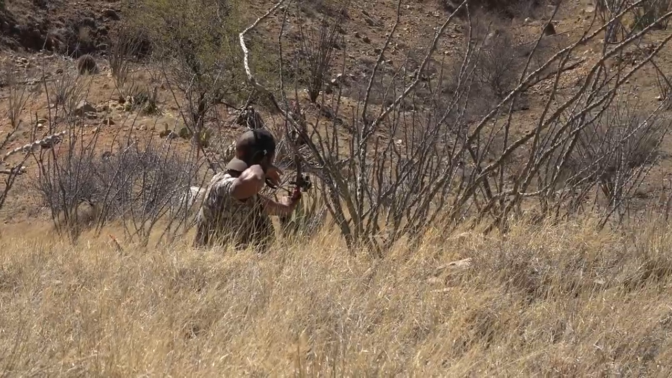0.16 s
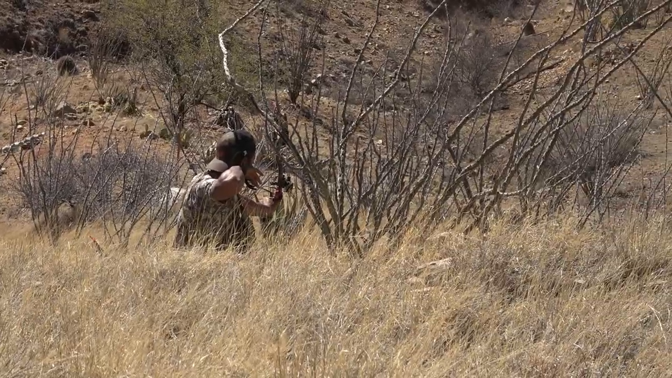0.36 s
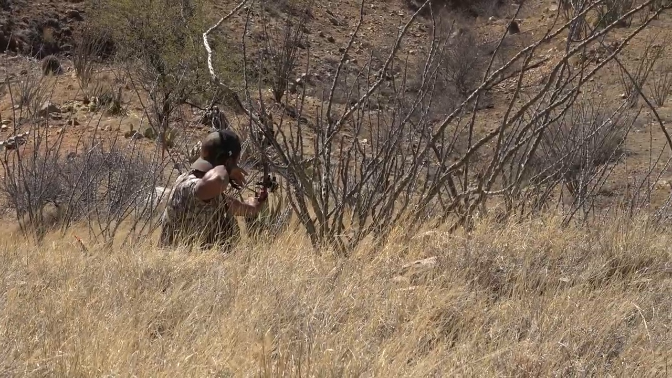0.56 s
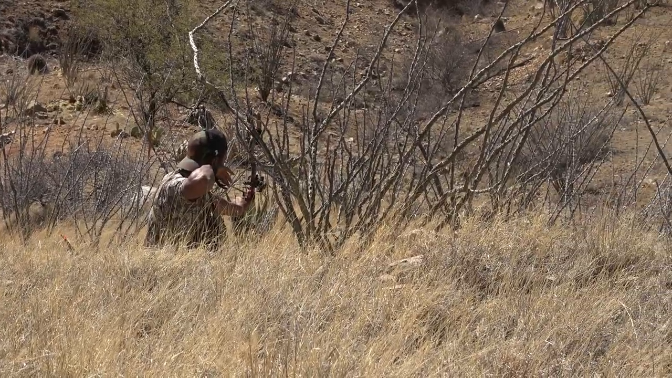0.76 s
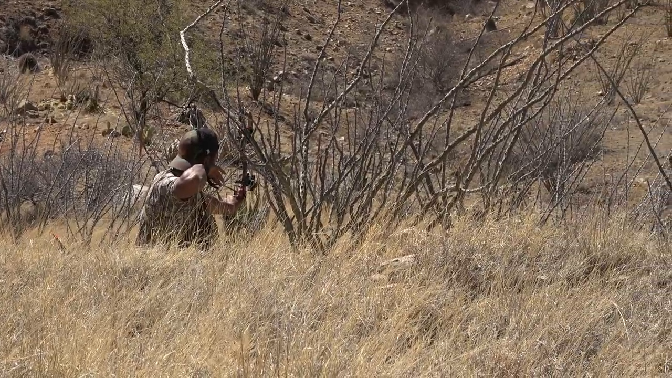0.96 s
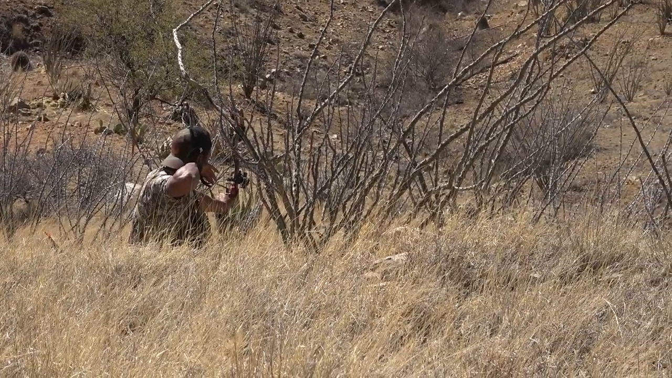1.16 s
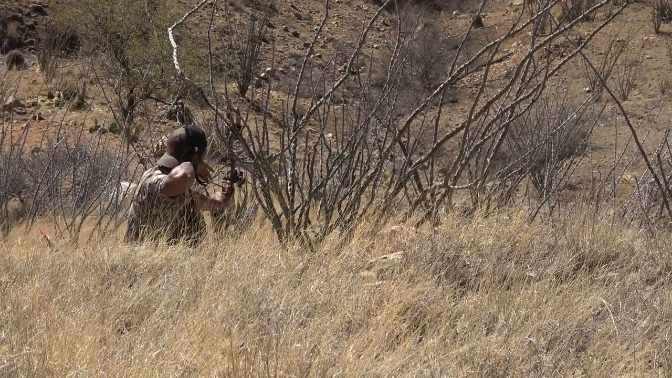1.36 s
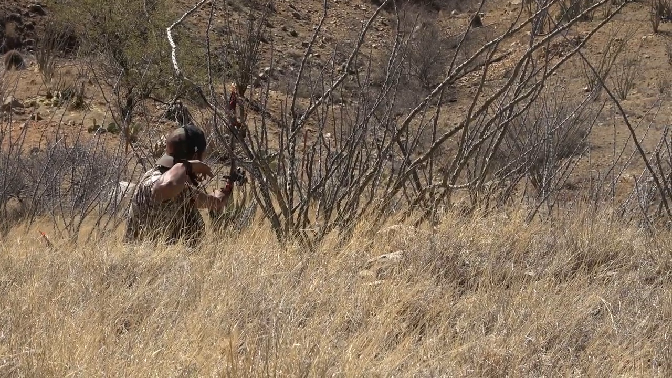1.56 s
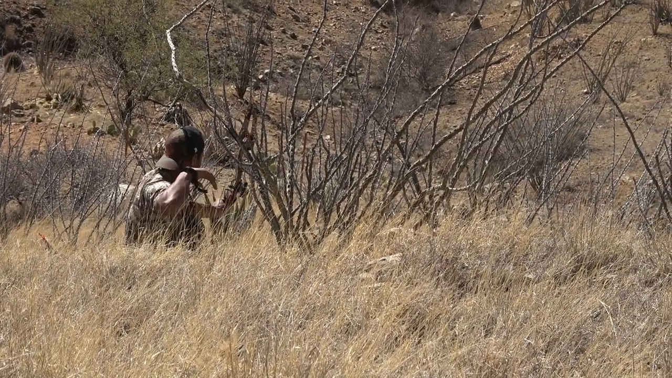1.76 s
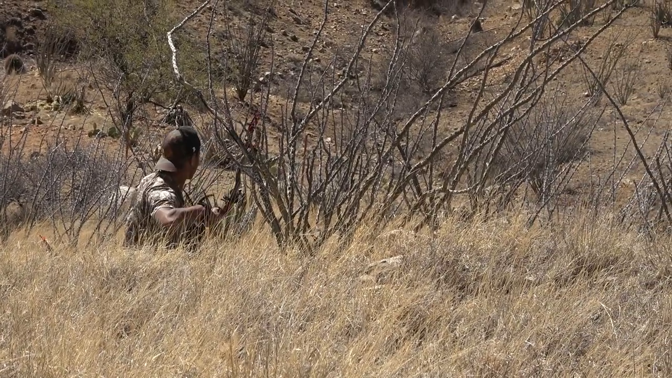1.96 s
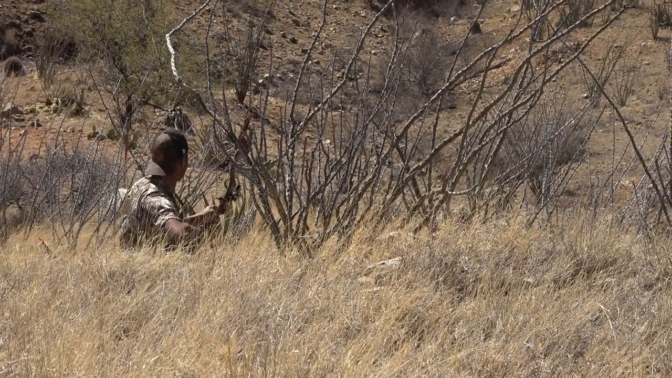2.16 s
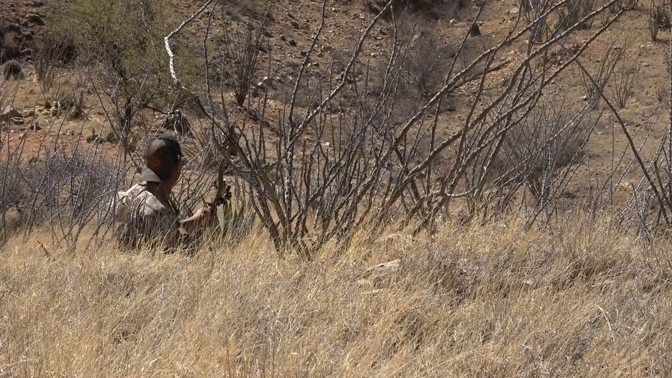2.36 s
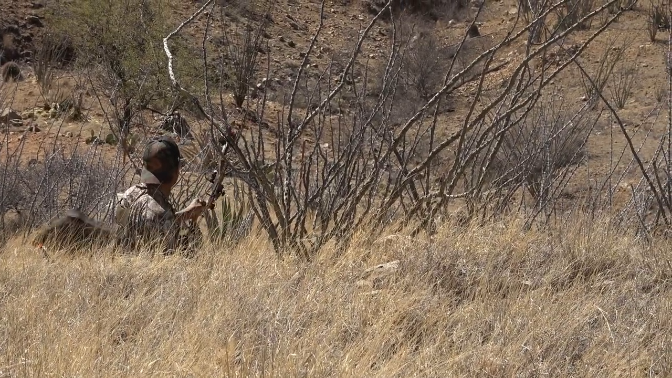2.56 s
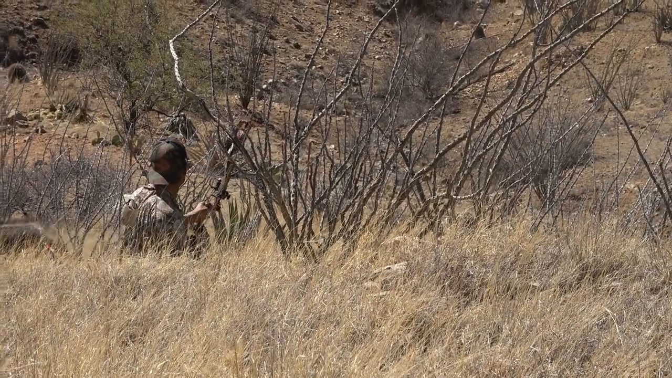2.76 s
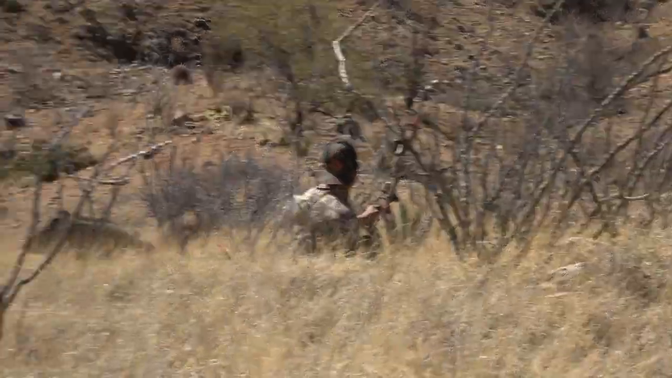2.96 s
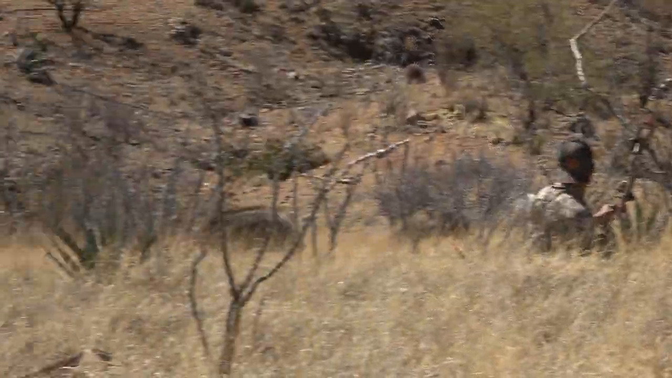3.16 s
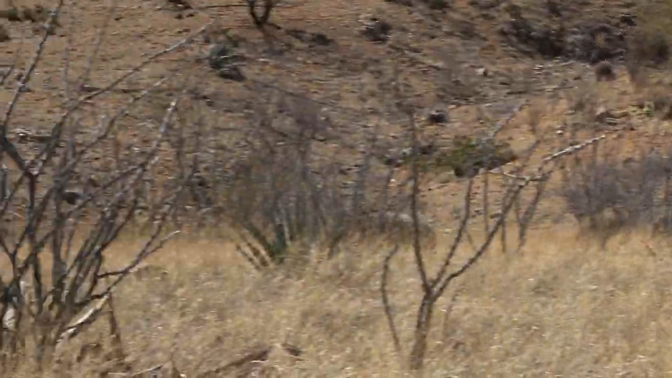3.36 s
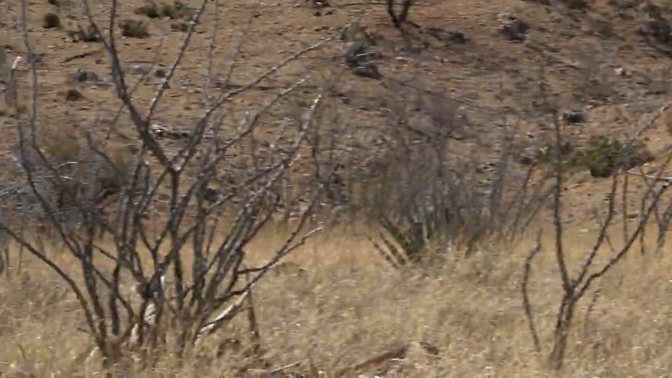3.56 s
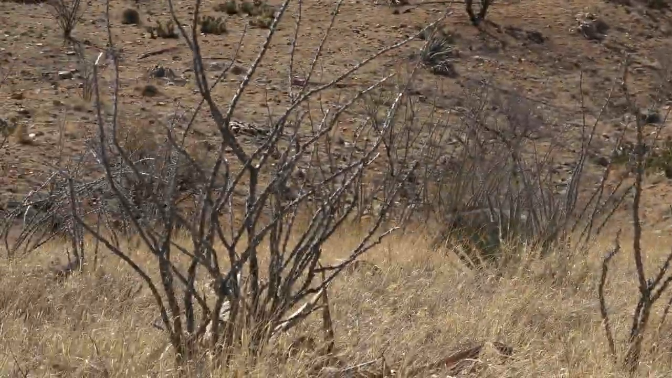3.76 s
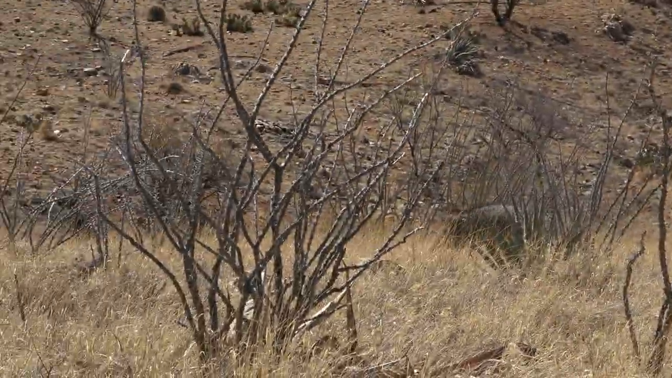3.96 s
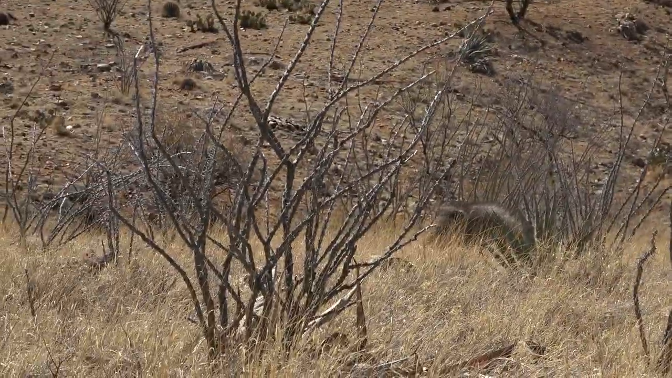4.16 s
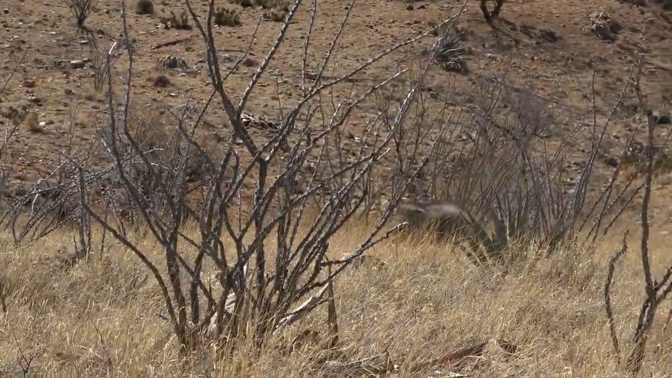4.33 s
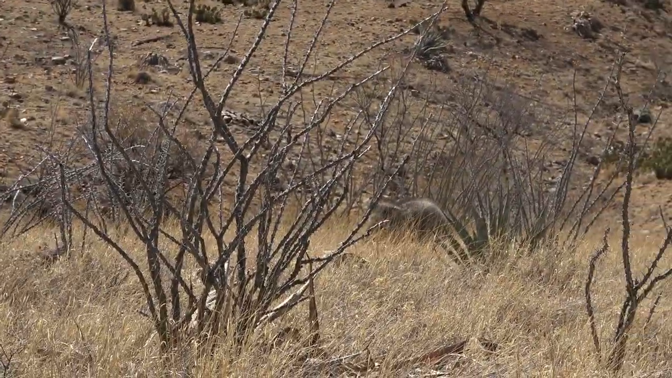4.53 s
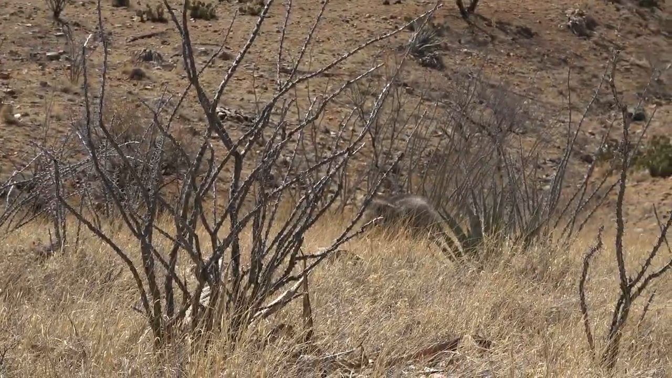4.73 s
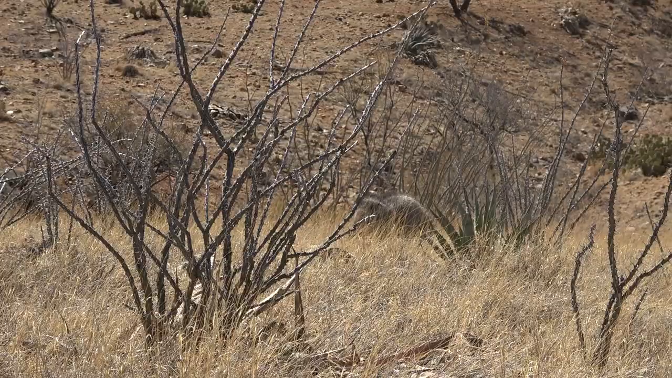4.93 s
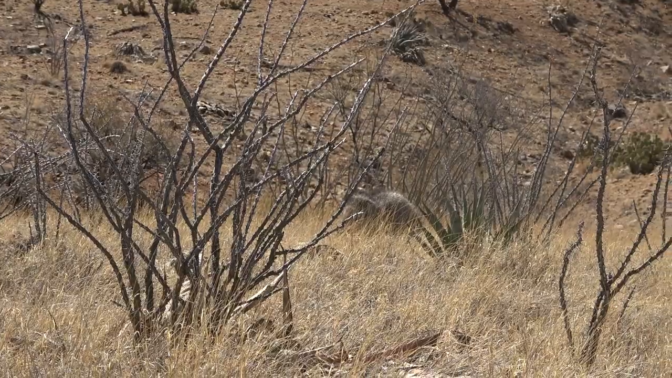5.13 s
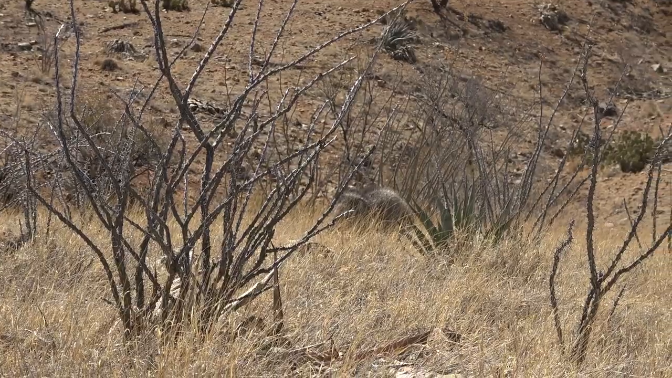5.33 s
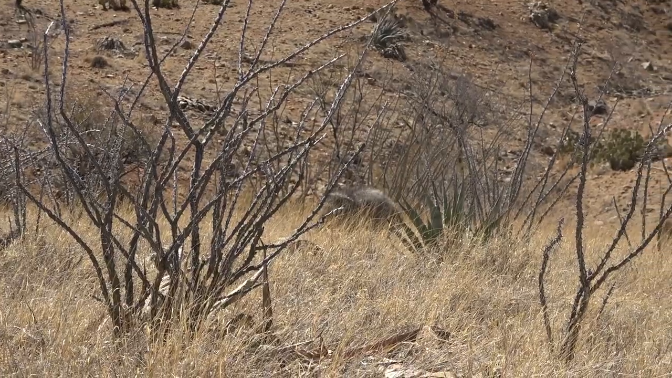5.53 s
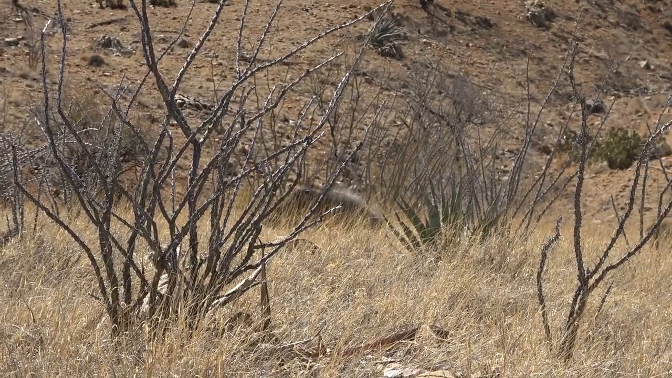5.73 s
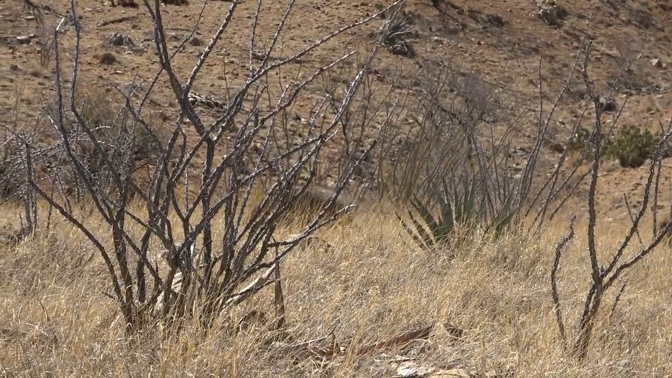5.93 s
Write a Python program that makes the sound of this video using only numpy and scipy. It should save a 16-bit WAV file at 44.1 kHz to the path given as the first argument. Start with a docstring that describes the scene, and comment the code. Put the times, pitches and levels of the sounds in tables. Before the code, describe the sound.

A bow fires with a sharp crack and the arrow knocks home, then faint twig snaps and grass rustle under buffeting wind.

```python
"""A windy dry hillside, where a bow is loosed. The release cracks and rings the bow's modes,
the string slams home, and the arrow hisses off through the air and strikes with dull knocks.
Grass and twigs tick as an animal runs off. Turbulent wind buffets the one microphone, on the
left input, over a far roar in the scrub. The right input is open and carries only amplifier
hiss and a thin high whine, which is fainter on the left."""
import sys
import numpy as np
from scipy import signal
from scipy.fft import rfft, irfft
from scipy.io import wavfile
from scipy.ndimage import uniform_filter1d

SR = 44100
rng = np.random.default_rng(int(sys.argv[2]) if len(sys.argv) > 2 else 0)


def wav_out(sig):
    """Save sig, one row per channel (or a flat mono array), as 16-bit PCM at SR to the path in sys.argv[1]."""
    wavfile.write(sys.argv[1], SR, np.round(np.clip(np.atleast_2d(sig).T, -1, 1) * 32767).astype(np.int16))


N = 264159

# spectrum of a hard impact on the bow: (frequency [Hz], level [dB])
CRACK_SPECTRUM = [(500, -34), (1500, -10), (3500, 6.5), (6000, -7.5), (8500, -5), (12000, -9.5),
                  (16000, -17)]
# wind pops, each with a dip of the background: (time [s], level [dB], dip depth [dB], dip length [s])
WIND_POPS = [(2.826, -40, 2.5, .02), (2.871, -38, 2.5, 0.018), (3.29, -40, 4, 0.044),
             (4.634, -30, 4, 0.027), (4.719, -30.5, 5, .03), (4.788, -28.5, 10, 0.054),
             (4.854, -28.5, 9, 0.026), (4.928, -31.5, 2, .03), (4.98, -27.5, 9, 0.032),
             (5.051, -29, 2.2, .04), (5.128, -34, 0, 0.028), (5.18, -30.5, 3, .03),
             (5.222, -31.5, 5, 0.095)]


def bow_release():
    """Impulse excitation: each jolt cracks and sets the damped modes of riser and limbs ringing."""
    # jolts through the bow: (time [s], level [dB], relative crack [dB], relative limb [dB], t60 [ratio])
    jolts = [(1.5586, -36, 12, -14, .6), (1.5661, -13.5, -15, -11, 0.51), (1.5696, -8.5, 9, -28, 0.7),
             (1.5746, -15, -17, -5, 1.7), (1.5798, -24, -6, -14, 0.79), (1.589, -18, 3, -5, 1.5),
             (1.5907, -15.5, -8, -4, 0.97), (1.602, -32, -4, -14, .7)]
    # modes of the riser: (frequency [Hz], level [dB], t60 [s])
    riser_modes = [(1094, -2, 0.049), (2054, -6, 0.065), (2320, -9, 0.044), (2760, -9, 0.014),
                   (3140, -5, 0.057), (3840, -20, 0.054), (3950, -2, 0.025), (1500, -11, 0.044),
                   (975, -12, 0.19), (3015, -3.5, 0.047), (5020, -9.5, 0.045), (616, -5.5, 0.025)]
    out = np.zeros(N)
    for s, db, crack_db, limb_db, lasting in jolts:
        riser = sum(amp(mode_db) * ring(hz * rng.uniform(0.88, 1.025), t60 * lasting, rng.random())
                    for hz, mode_db, t60 in riser_modes) / 3
        limb = amp(limb_db) * ring(hz=262, t60=0.14)
        add(out, s, amp(db) * (riser + limb))
        add(out, s, amp(db + crack_db) * burst(CRACK_SPECTRUM, tau_s=0.0009))
    return out


def string_slam():
    """Impact and damping: the string slaps its stop, then string and limbs thump to rest."""
    # slaps on the stop: (time [s], level [dB], relative crack [dB])
    slaps = [(1.6411, -7, -6), (1.6424, -21, 4), (1.6487, -25, -14)]
    # modes of the stop: (frequency [Hz], level [dB], t60 [s])
    stop_modes = [(1360, 2, 0.01), (2140, 2.5, 0.0094), (724, -12.5, 0.04), (2840, -36, 0.016),
                  (1050, -13, 0.029)]
    # settling thumps: (time [s], level [dB], pitch [ratio], t60 [ratio])
    thumps = [(1.6404, -6, 1.75, 0.97), (1.6478, -1, 1, .95), (1.665, -24, 1.4, 0.88),
              (1.6768, -14, 1.5, 1.04), (1.702, -17.5, .84, 2.9)]
    # modes of a thump: (frequency [Hz], level [dB], t60 [s])
    thump_modes = [(132, 0.5, 0.027), (383, -24.5, 0.11)]
    out = np.zeros(N)
    for s, db, crack_db in slaps:
        add(out, s, -amp(db) * modal_sum(stop_modes) / 2)
        add(out, s, amp(db + crack_db) * burst(CRACK_SPECTRUM, tau_s=0.00087))
    for s, db, pitch, lasting in thumps:
        add(out, s, amp(db) * modal_sum(thump_modes, pitch, lasting))
    return out


def arrow_flight():
    """Aerodynamic noise: air passing string and fletching makes a rush, a hiss and a narrow whistle."""
    # rushes of air: (time [s], hiss level [dB], low rush level [dB], time to fall 20 dB [s])
    rushes = [(1.561, -38, -32, 0.0477), (1.572, -33.5, -20, 0.03), (1.59, -40, -32, 0.06),
              (1.643, -31, -17.5, 0.0141), (1.655, -44, -36.5, .04), (1.677, -49, -39.5, 0.08),
              (1.727, -43.5, -36.5, 0.0639), (1.75, -58, -37, 0.1637)]
    # fletching hiss: (frequency [Hz], spectral density [dB])
    hiss_spectrum = [(3000, 0.5), (6000, -7.5), (8000, -0.5), (10500, -4.5), (12500, -18), (16000, -17)]
    # low rush of air: (frequency [Hz], spectral density [dB])
    rush_spectrum = [(200, 21), (500, 1.5), (1600, -1), (2400, -4), (4000, -29), (7000, -51.5)]
    rise_s = 0.0023
    hiss_gain = envelope(1.65, db=-54.5, rise_s=0.018, hold_s=0.087, fall_db_per_s=330)
    rush_gain = np.zeros(N)
    for s, hiss_db, rush_db, fall_s in rushes:
        hiss_gain += envelope(s, hiss_db, rise_s, 0, 20 / fall_s)
        rush_gain += envelope(s, rush_db, rise_s, 0, 20 / fall_s)
    flare = envelope(1.737, db=-40, rise_s=0.016, hold_s=0, fall_db_per_s=2400)
    whistle_gain = amp(-14) * hiss_gain + flare
    whistle = unit_rms(resonate(rng.standard_normal(N), hz=7590, width_hz=110))
    return hiss_gain * noise(hiss_spectrum) + rush_gain * noise(rush_spectrum) + whistle_gain * whistle


def arrow_strikes():
    """Heavily damped vibration: each knock excites the shaft's modes over one low body mode."""
    # knocks: (time [s], level [dB], pitch [ratio], relative body [dB], t60 [ratio])
    strikes = [(1.7272, -24.5, 0.96, -15, 1.4), (1.7568, -10, 0.97, -2, 0.93),
               (2.1407, -23.5, 0.71, -28, 0.45), (2.143, -24.5, 0.51, -12, 0.44)]
    # modes of the shaft: (frequency [Hz], level [dB], t60 [s])
    shaft_modes = [(1730, 5, 0.017), (2120, -8.5, 0.036), (3620, -13, 0.014), (960, -7, 0.014),
                   (490, -5, 0.041), (4500, -18.5, .015)]
    out = np.zeros(N)
    for s, db, pitch, body_db, lasting in strikes:
        add(out, s, -amp(db) * modal_sum(shaft_modes, pitch, lasting) / 2.36)
        add(out, s + 0.0011, amp(db + body_db) * ring(hz=362 * pitch, t60=0.019 * lasting))
    return out


def rattle_and_echoes():
    """Scattering: the rattle and its echoes keep the riser's resonances; the higher return later."""
    # resonances, rising in pitch: (frequency [Hz], bandwidth [Hz], level [dB])
    resonances = [(1075, 510, 1), (2040, 440, 2.5), (2800, 130, -4), (3416, 380, 7), (4080, 470, 7),
                  (4500, 280, -2), (5300, 420, -11)]
    # decay of the rattle: (low resonances [dB/s], high resonances [dB/s])
    rattle_falls = [500, 650]
    grain = rng.standard_normal(N) * flicker(depth_db=1.7, size=150)
    bands = [amp(db) * unit_rms(resonate(resonate(grain, hz, width), hz, width))
             for hz, width, db in resonances]
    low_rattle, high_rattle = [envelope(1.572, db, rise_s=0.0074, hold_s=0.027, fall_db_per_s=fall)
                               for db, fall in zip((-31.5, -33), rattle_falls)]
    low_echo = envelope(1.707, db=-49, rise_s=0.03, hold_s=0.12, fall_db_per_s=50)
    high_echo = envelope(1.823, db=-49.5, rise_s=0.12, hold_s=0.12, fall_db_per_s=45)
    low = unit_rms(sum(bands[:3])) * (low_rattle + low_echo)
    high = unit_rms(sum(bands[3:])) * (high_rattle + high_echo)
    fade_out = envelope(0, db=0, rise_s=1, hold_s=2.19, fall_db_per_s=250)
    return fade_out * (low + high)


def stalk_snap(db, hz, treble_db, middle_db):
    """Brittle fracture: a breaking stalk gives low, middle and treble puffs and a short woody ring."""
    # middle of the snap: (frequency [Hz], spectral density [dB])
    twig_spectrum = [(900, -30), (1900, 10), (3200, -18), (5000, -5), (8000, -16)]
    # dry treble tick: (frequency [Hz], spectral density [dB])
    tick_spectrum = [(2000, -14), (4000, 0), (6500, 0), (9000, -4), (12000, -9), (16000, -9)]
    tau_s = 0.004
    body = burst([(hz / 5, -12), (hz, 0), (hz * 2, -12), (16000, -60)], tau_s)
    middle = amp(middle_db) * burst(twig_spectrum, tau_s)
    tick = amp(treble_db) * burst(tick_spectrum, tau_s)
    wood = amp(-2) * ring(hz, t60=0.013)[:len(body)]
    return amp(db) * (body + middle + tick + wood)


def twig_snaps():
    """Discrete transients: single stalks break, with smaller ones at random while the animal runs."""
    # snaps: (time [s], level [dB], centre [Hz], relative treble [dB], relative middle [dB])
    snaps = [(1.338, -35.5, 1090, -19, -16), (2.366, -44.5, 955, 1, -7), (2.648, -50, 900, 5, -12),
             (2.764, -37.5, 1130, -20, -18), (2.979, -32, 720, -24, -19), (3.095, -41, 895, -20, -4),
             (3.172, -28, 850, -21, -12), (3.182, -38, 1250, 0, -15), (3.276, -40, 1300, -2, -6),
             (3.356, -34, 690, -24, -24), (3.619, -28.5, 930, -26, -16), (3.777, -41, 1300, -5, -2),
             (3.889, -39, 920, -20, -18), (4.012, -40, 1090, -20, -13), (4.455, -41, 1190, -22, -2),
             (5.547, -39.5, 1130, -22, -27), (5.862, -39.5, 1310, -22, -14), (5.943, -43, 990, -21, 3)]
    run_start_s, run_length_s, small_snap_count = 2.2, 2.3, 6
    out = np.zeros(N)
    for s, *settings in snaps:
        add(out, s, stalk_snap(*settings))
    for when, pitch, bright in rng.random((small_snap_count, 3)):
        small = stalk_snap(-49.5, 800 + 500 * pitch, -22 + 10 * bright, -16 + 10 * bright)
        add(out, run_start_s + run_length_s * when, small)
    return out


def grass_rustle():
    """Shot noise: random ticks of many dry blades merge into a crackle that swells with movement."""
    # grass brushed in passing: (time [s], level [dB])
    rustle_levels = [(0, -72), (1.5, -58.5), (2.9, -62), (3.06, -66), (3.14, -52.5), (3.25, -57),
                     (3.42, -62.5), (3.77, -54.5), (4.2, -65.5), (5.6, -67), (5.99, -60.5)]
    # tick of one blade: (frequency [Hz], spectral density [dB])
    blade_spectrum = [(400, -4.5), (1000, 1.5), (2200, -0.5), (4500, -7.5), (8000, -11.5), (16000, -21)]
    ticks_per_s, kinds = 400, 4
    strengths = amp(2.2 * np.minimum(rng.exponential(1, (kinds, N)), 4))
    impulses = strengths * (rng.random((kinds, N)) < ticks_per_s / kinds / SR)
    blades = sum(signal.oaconvolve(train, burst(blade_spectrum, tau_s=0.0054))[:N] for train in impulses)
    return amp(curves(rustle_levels)[0]) * unit_rms(blades)


def wind_buffeting():
    """Turbulence: large eddies heave the diaphragm toward its limit; small ones rumble and drone."""
    # wind on the capsule: (time [s], gust [dB], rumble [dB], hollow drone [dB])
    wind_levels = [(0.0, -18, -31.5, -40), (0.2, -16.5, -33.5, -34), (0.6, -32.5, -36, -28.5),
                   (0.7, -18, -20, -36.5), (0.87, -22.5, -36.5, -25.5), (1.01, -25, -28, -39.5),
                   (1.08, -26.5, -30.5, -22.5), (1.37, -11, -34, -28), (1.43, -19, -27.5, -36),
                   (1.61, -20, -34, -30.5), (1.7, -16.5, -21.5, -24), (1.9, -20, -31, -32),
                   (2.21, -9.5, -26, -33), (2.27, -15, -36, -48), (2.35, -21.5, -18.5, -38),
                   (2.45, -5.5, -30.5, -36), (2.53, -20, -29.5, -33.5), (2.66, -14, -38, -38.5),
                   (2.73, -11.5, -21, -27.5), (2.81, -9.5, -26, -32.5), (3.2, -13, -23.5, -25.5),
                   (3.31, -11.5, -25.5, -36.5), (3.7, -21, -25, -26), (4.06, -17.5, -34, -33.5),
                   (4.31, -12, -22.5, -29.5), (5.33, -15, -29.5, -34.5), (5.78, -18.5, -26, -35.5),
                   (5.86, -35, -37, -39), (5.93, -15, -35, -23.5), (5.98, -9, -32.5, -38)]
    # four bands of eddies, each: (frequency [Hz], spectral density [dB])
    heave = [(3, -76), (6, -10.5), (9, 3), (13, -1), (18, -12), (26, -47)]
    rumble = [(14, -24), (20, 7), (30, 0), (46, 3.5), (60, -21.5)]
    drone = [(40, -25), (52, -4.5), (63, 2), (72, -10), (90, -20)]
    flutter = [(70, -33), (90, 0), (125, -4.5), (160, -14.5), (200, -22.5)]
    # depth of chance swells: (heave [dB], rumble [dB], drone [dB], flutter [dB])
    swell_depths = [1.7, 3.8, 2.06, 3.92]
    travel_limit = 0.5
    gust_db, rumble_db, drone_db = curves(wind_levels)
    flutter_db = -44 + 0.67 * (gust_db + 14)
    levels_db = [gust_db, rumble_db, drone_db, flutter_db]
    pressure = np.zeros(N)
    for db, depth_db, spectrum in zip(levels_db, swell_depths, [heave, rumble, drone, flutter]):
        swells = amp(depth_db * unit_rms(smooth(rng.standard_normal(N), size=3000)))
        eddies = noise(spectrum)
        steady = eddies / np.sqrt(smooth(eddies ** 2, size=4000) + 0.0057)  # evens out its own swells
        pressure += amp(db) * swells * steady
    return travel_limit * np.tanh(pressure / travel_limit)


def wind_pops():
    """Pressure pulses: small eddies make dull pops in the windshield."""
    # one pop: (frequency [Hz], spectral density [dB])
    pop_spectrum = [(80, 7), (300, -5.5), (700, -10), (1500, -17), (2200, -36), (5000, -60)]
    out = np.zeros(N)
    for s, db, *_ in WIND_POPS:
        add(out, s, amp(db) * burst(pop_spectrum, tau_s=0.007))
    return out


def background():
    """Noise floor: far wind roars on the left, the open right input hisses, and both carry a whine."""
    # slow drift: (time [s], floor level [dB], relative low roar [dB])
    drift = [(0.0, -60.5, 1), (1.7, -58.5, -0.5), (2.2, -61, 0.4), (3.85, -61.5, 2.5), (4.87, -63.5, 1.2),
             (5.99, -63.5, 0.5)]
    # far wind in the scrub: (frequency [Hz], spectral density [dB])
    roar_spectrum = [(82, -16), (140, -8.5), (171, -12.5), (213, -0.5), (235, -4.5), (260, -13.5),
                     (336, -18), (394, -19.5), (472, -10.5), (624, -20.5), (1070, -25.5), (1330, -23),
                     (1650, -31.5), (14500, -39.5), (16400, -48)]
    # amplifier hiss: (frequency [Hz], spectral density [dB])
    hiss_spectrum = [(10, 23), (25, 16.5), (100, 5), (300, 3.5), (1000, 0.5), (8000, -2), (16000, -3)]
    whine_hz, whine_left_db, whine_right_db = 15734, -11, -1.5
    floor_db, low_roar_db = curves(drift)
    roar_gain = 2 * amp(17.5) * flicker(depth_db=0.76, size=500)
    low_roar = signal.lfilter(*signal.butter(1, 2000, fs=SR), noise(roar_spectrum))
    roar = roar_gain * (0.59 * noise(roar_spectrum) + amp(low_roar_db - 1) * low_roar)
    hiss = amp(-1.5) * noise(hiss_spectrum)
    whine = np.sin(2 * np.pi * whine_hz * np.arange(N) / SR)
    inputs = np.array([roar + amp(whine_left_db) * whine, hiss + amp(whine_right_db) * whine])
    return amp(floor_db) * inputs


def background_dips():
    """Amplitude modulation: a bell-shaped dip in gain follows each wind pop or loud blow."""
    # dips at loud blows: (time [s], depth [dB], length [s])
    blow_dips = [(1.57, 6, .02), (1.645, 6, .027), (1.695, 6, .016)]
    t = np.arange(N) / SR
    return amp(-sum(db * np.exp(-(2.25 * ((t - s) / length - 0.5)) ** 2)
                    for s, *_, db, length in WIND_POPS + blow_dips))


def amp(db):
    """Amplitude ratio for a level in dB."""
    return 10 ** (np.asarray(db) / 20)


def unit_rms(x):
    """Normalisation to rms 1."""
    return x / np.sqrt(np.mean(x ** 2) + 1e-20)


def smooth(x, size):
    """Low-pass filtering by two moving averages of size samples."""
    return uniform_filter1d(uniform_filter1d(x, size), size)


def flicker(depth_db, size):
    """Random modulation: a gain that wanders by depth_db rms, averaged over size samples."""
    return amp(depth_db * unit_rms(uniform_filter1d(rng.standard_normal(N), size)))


def spectrum_db(spectrum, hz):
    """Interpolation of a spectrum on a logarithmic frequency axis."""
    knots_hz, db = np.transpose(spectrum)
    return np.interp(np.log(hz + 1), np.log(knots_hz + 1), db)


def curves(rows):
    """Linear interpolation of each column after the time column, at every sample."""
    s, *columns = np.transpose(rows)
    return [np.interp(np.arange(N) / SR, s, column) for column in columns]


def envelope(s, db, rise_s, hold_s, fall_db_per_s):
    """Gain that swells up to time s, holds, then decays exponentially for one second."""
    t = np.arange(N) / SR - s
    return np.clip(1 + t / rise_s, 0, 1) ** 2 * amp(db - fall_db_per_s * np.clip(t - hold_s, 0, 1))


def add(mix, s, sound):
    """Superposition of a sound on the mix at time s."""
    part = mix[round(s * SR):][:len(sound)]
    part += sound[:len(part)]


def noise(spectrum):
    """Spectral shaping: steady noise of rms 1, cut by 60 dB outside the table."""
    hz = np.fft.rfftfreq(N, 1 / SR)
    outside = (hz < spectrum[0][0]) | (hz > spectrum[-1][0])
    gain = amp(spectrum_db(spectrum, hz) - 60 * outside)
    return unit_rms(irfft(rfft(rng.standard_normal(N)) * gain, N))


def burst(spectrum, tau_s):
    """Exponential decay of a puff of coloured noise; the time constant sets its energy."""
    t = np.arange(2048) / SR
    gain = amp(spectrum_db(spectrum, np.fft.rfftfreq(2048, 1 / SR)))
    coloured = irfft(rfft(rng.standard_normal(2048)) * gain)
    shape = np.exp(-t / tau_s) * np.minimum(t * 3000, 1)
    return unit_rms(coloured * shape) * np.sqrt(np.mean(shape ** 2)) / 2


def resonate(x, hz, width_hz):
    """Forced response of a two-pole resonator."""
    r = np.exp(-np.pi * width_hz / SR)
    return signal.lfilter([1 - r, 0, r - 1], [1, -2 * r * np.cos(2 * np.pi * hz / SR), r * r], x)


def ring(hz, t60, phase_turns=0.0):
    """Free vibration of one damped mode, falling 60 dB in t60 seconds."""
    t = np.arange(9000) / SR
    return amp(-60 * t / t60) * np.sin(2 * np.pi * (hz * t + phase_turns)) * np.minimum(t * 4000, 1)


def modal_sum(modes, pitch=1, lasting=1):
    """Superposition of modes struck together; pitch scales their frequencies, lasting their t60."""
    return sum(amp(db) * ring(hz * pitch, t60 * lasting) for hz, db, t60 in modes)


def scene():
    """Superposition: all near sources reach the left input only, over the background of both."""
    wind = wind_buffeting() + wind_pops()
    shot = bow_release() + string_slam() + arrow_flight() + arrow_strikes() + rattle_and_echoes()
    brush = twig_snaps() + grass_rustle()
    left = 2 * (shot + brush + wind)
    return np.array([left, np.zeros(N)]) + background() * background_dips()


def record(dry):
    """Soft saturation rounds overloads off just under full scale; a low-pass limits the band."""
    edge_hz = 15900
    rounded = dry / (1 + np.abs(dry) ** 6) ** (1 / 6)
    taps = signal.firwin(1023, edge_hz, window=("kaiser", 9), fs=SR)
    return signal.oaconvolve(rounded, taps[None], "same")


dry = scene()
out = record(dry)
wav_out(out)
```